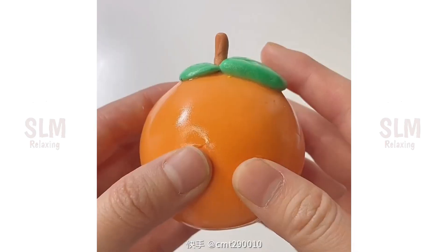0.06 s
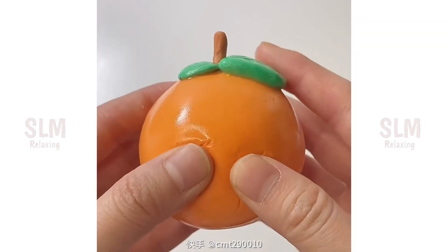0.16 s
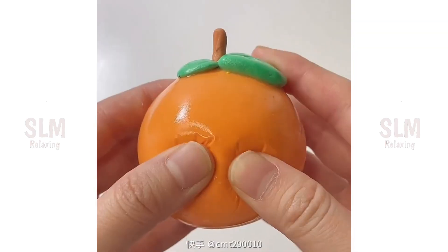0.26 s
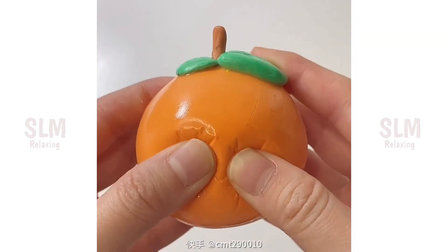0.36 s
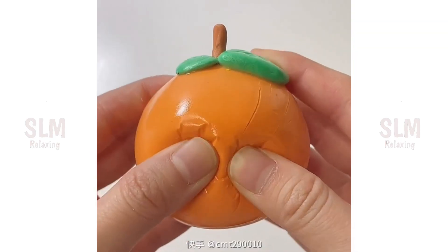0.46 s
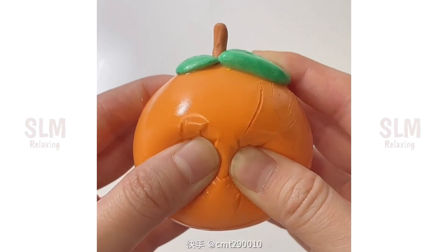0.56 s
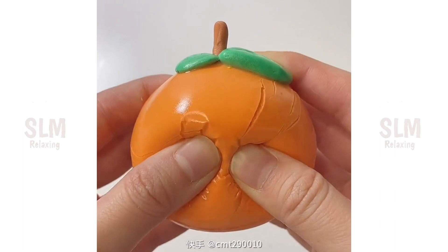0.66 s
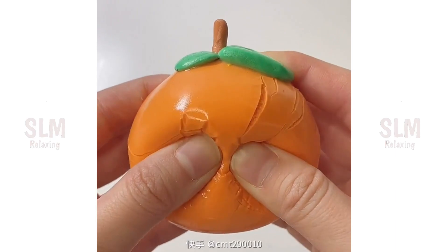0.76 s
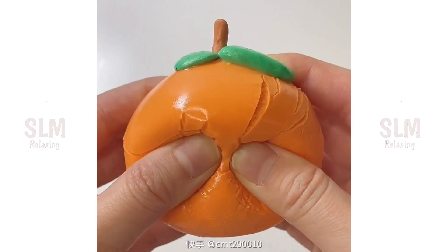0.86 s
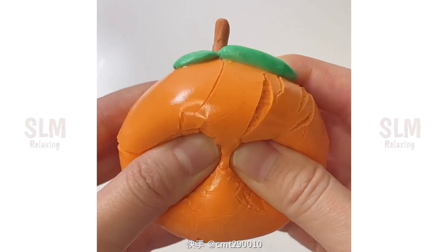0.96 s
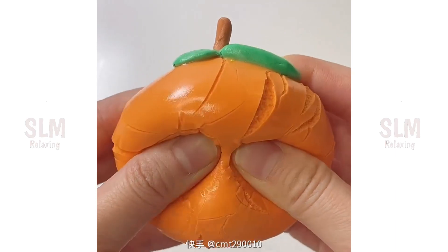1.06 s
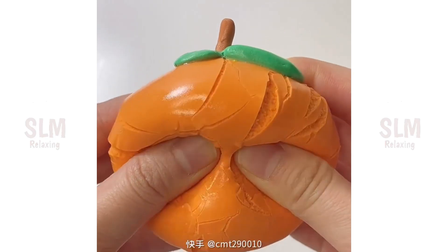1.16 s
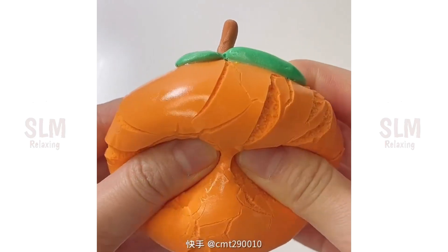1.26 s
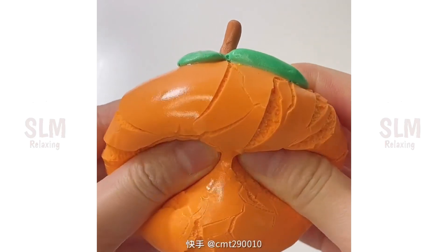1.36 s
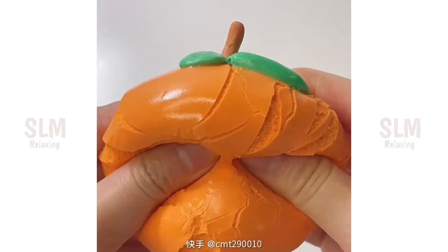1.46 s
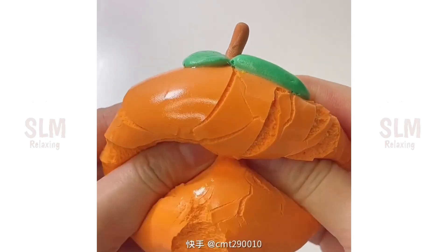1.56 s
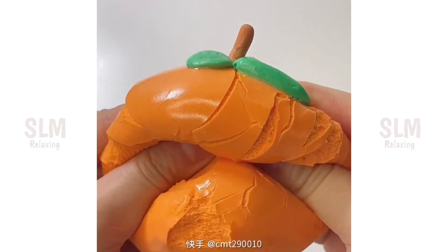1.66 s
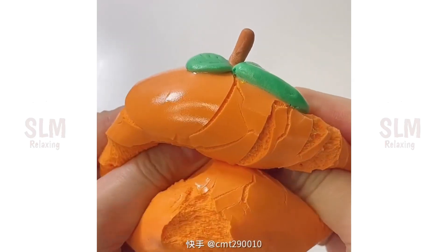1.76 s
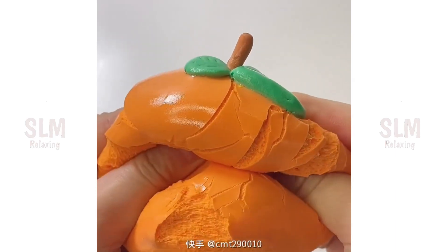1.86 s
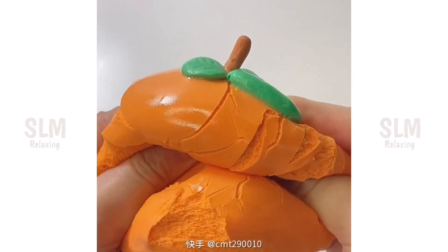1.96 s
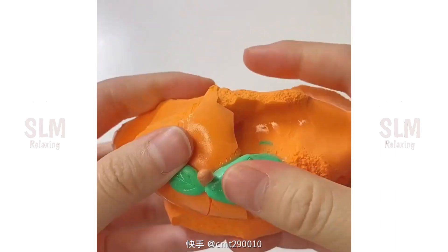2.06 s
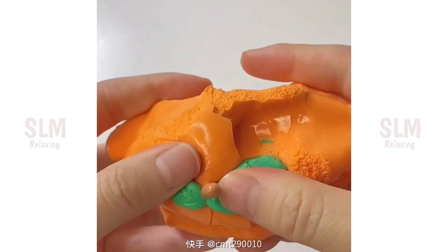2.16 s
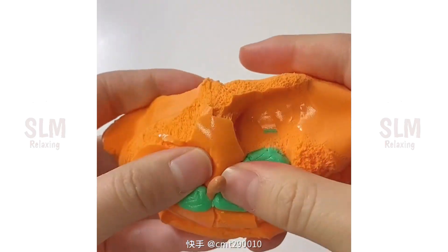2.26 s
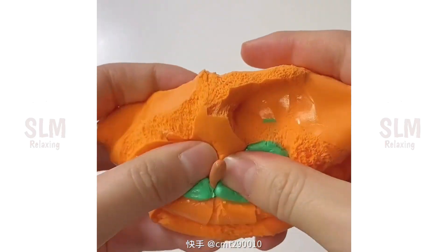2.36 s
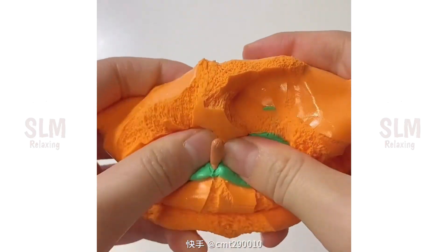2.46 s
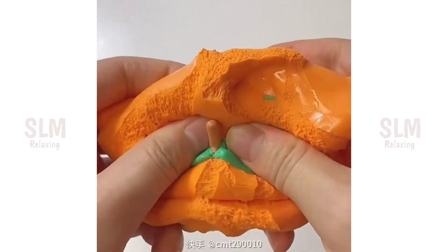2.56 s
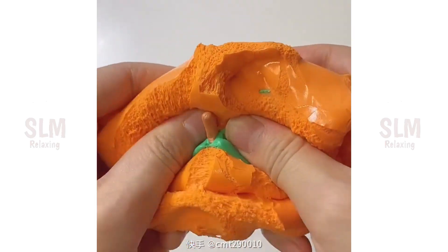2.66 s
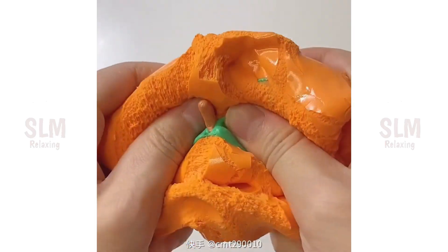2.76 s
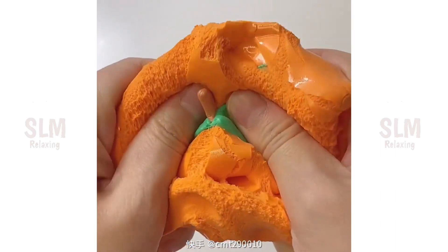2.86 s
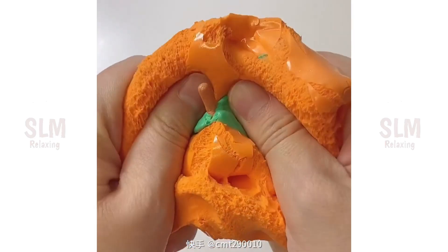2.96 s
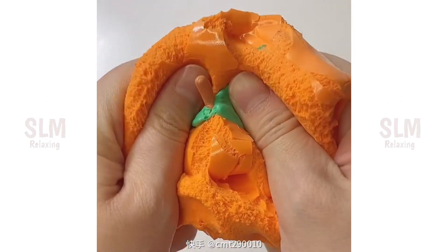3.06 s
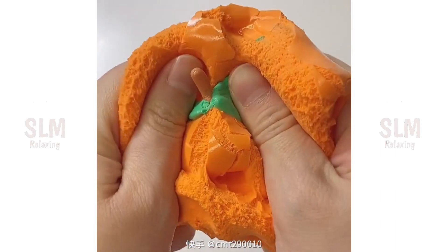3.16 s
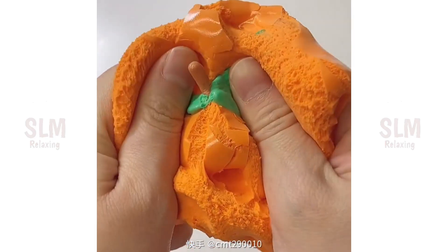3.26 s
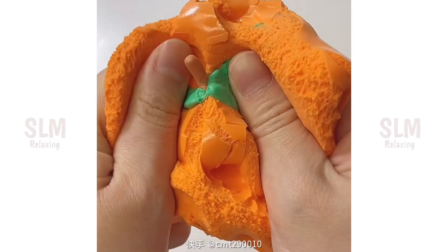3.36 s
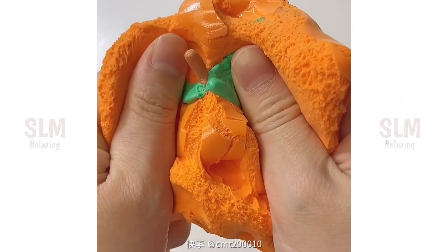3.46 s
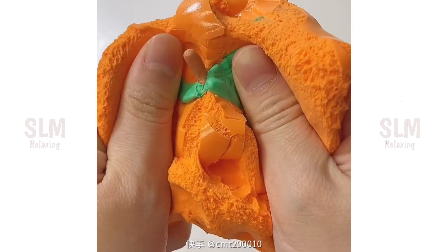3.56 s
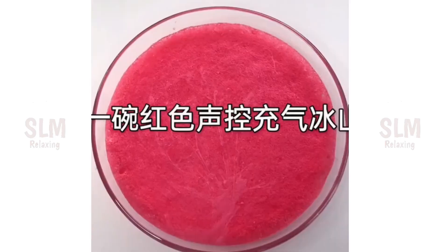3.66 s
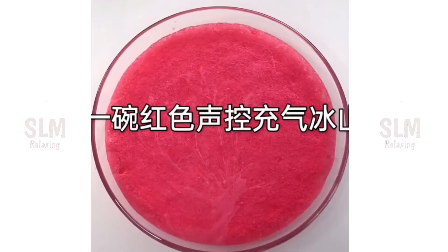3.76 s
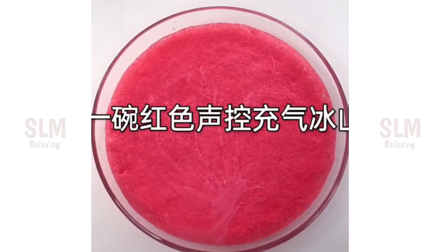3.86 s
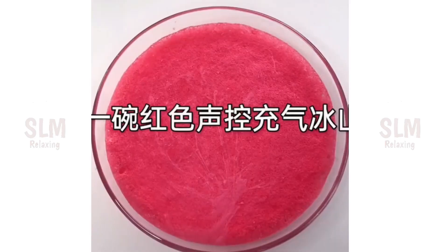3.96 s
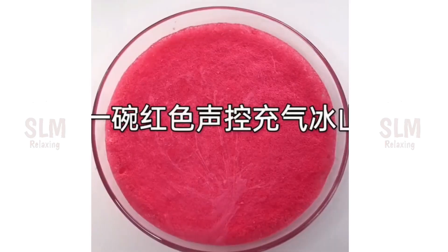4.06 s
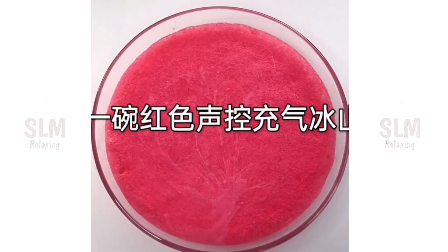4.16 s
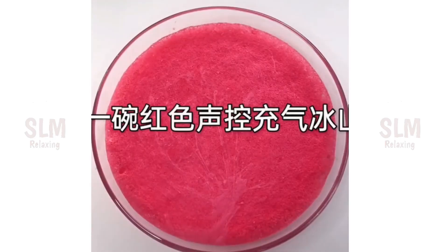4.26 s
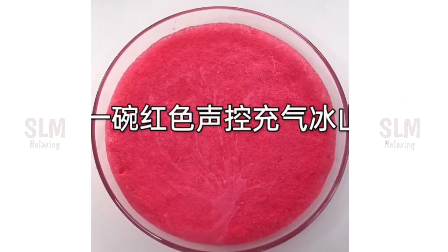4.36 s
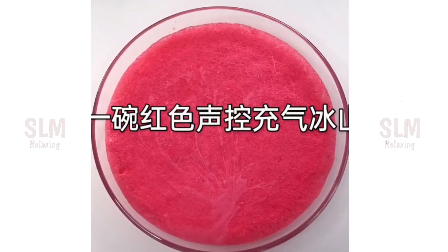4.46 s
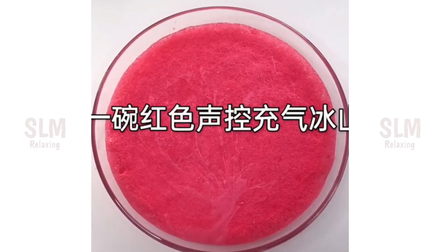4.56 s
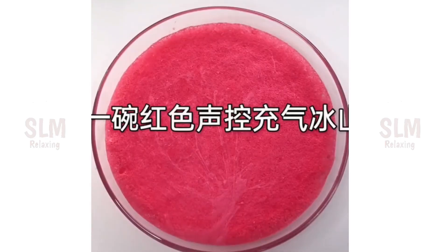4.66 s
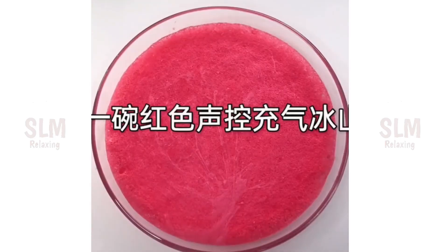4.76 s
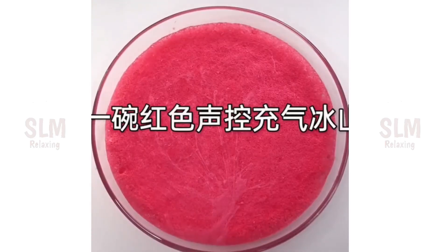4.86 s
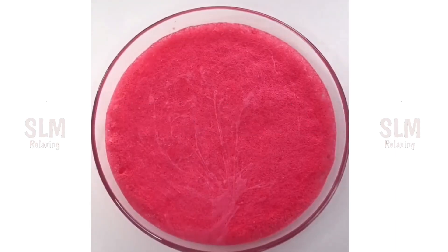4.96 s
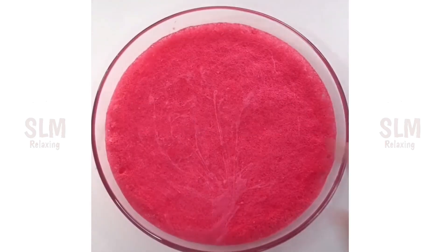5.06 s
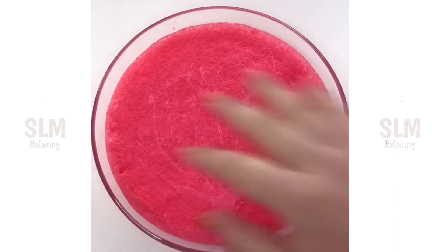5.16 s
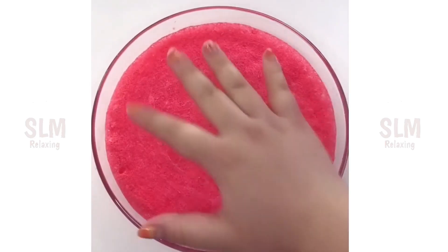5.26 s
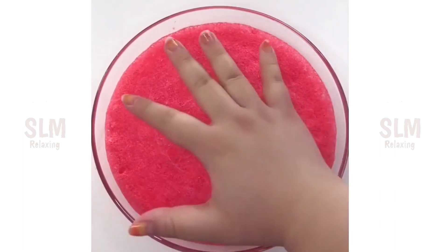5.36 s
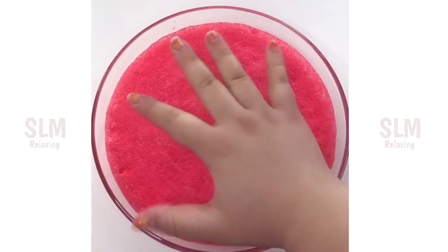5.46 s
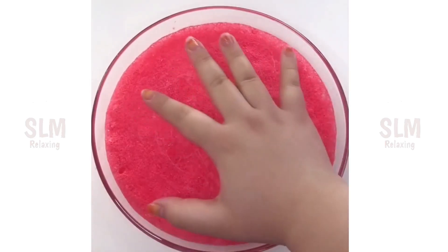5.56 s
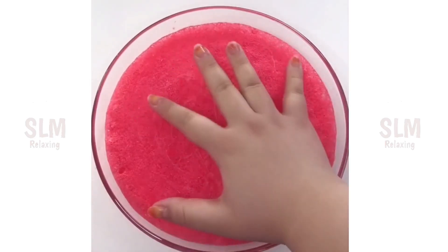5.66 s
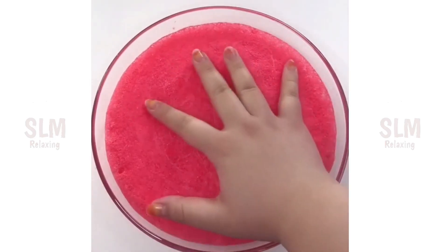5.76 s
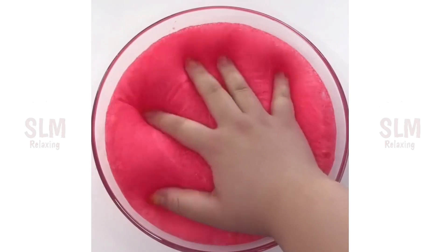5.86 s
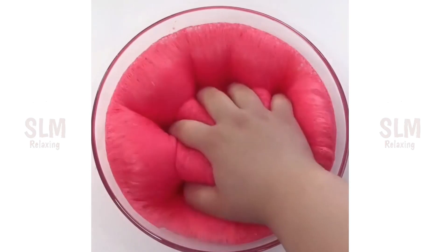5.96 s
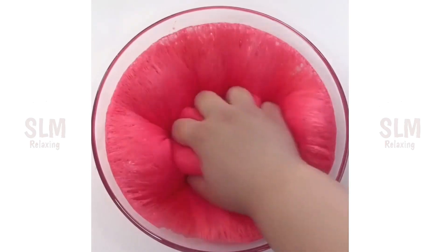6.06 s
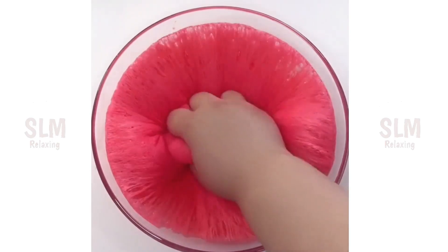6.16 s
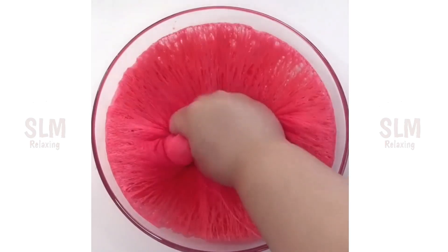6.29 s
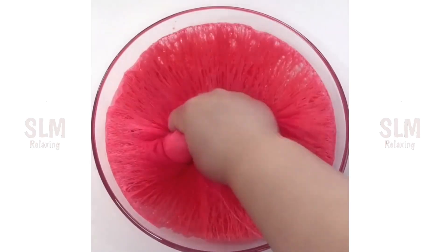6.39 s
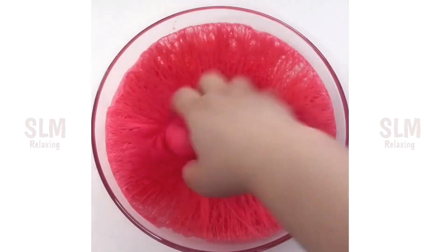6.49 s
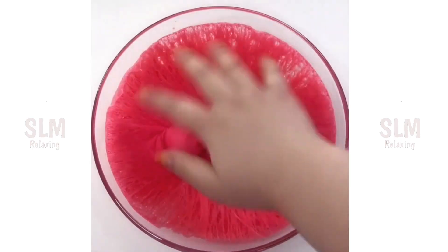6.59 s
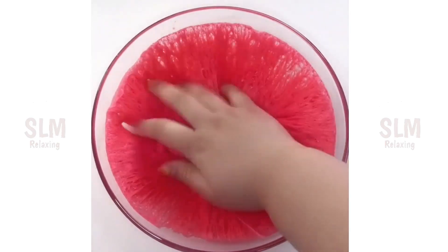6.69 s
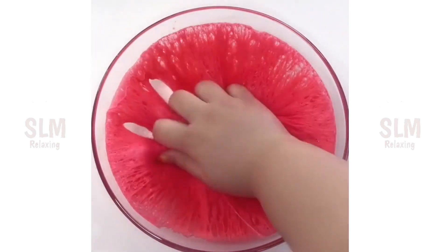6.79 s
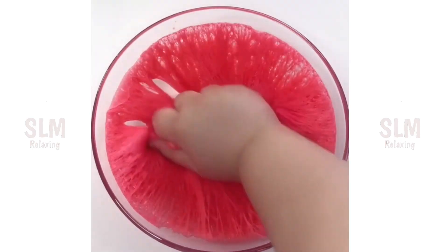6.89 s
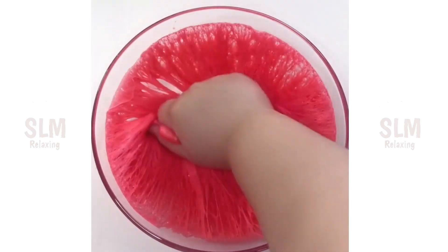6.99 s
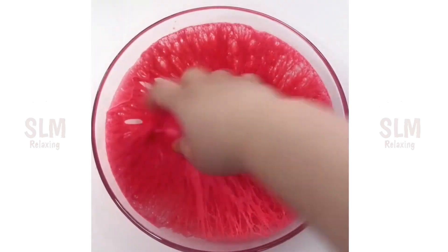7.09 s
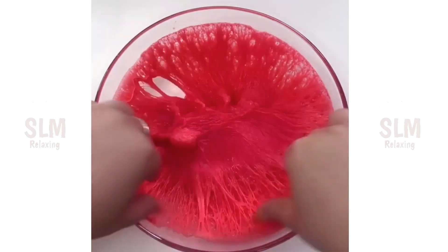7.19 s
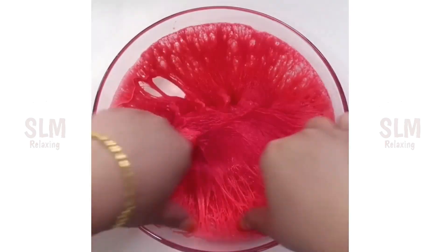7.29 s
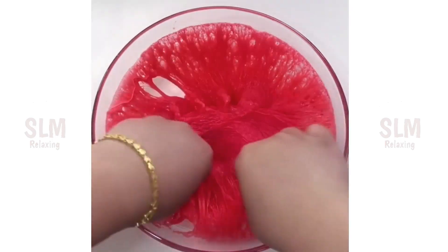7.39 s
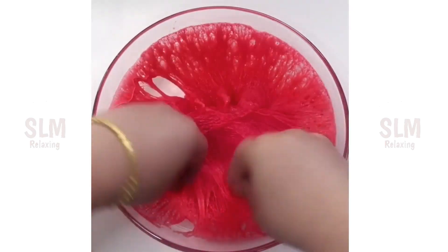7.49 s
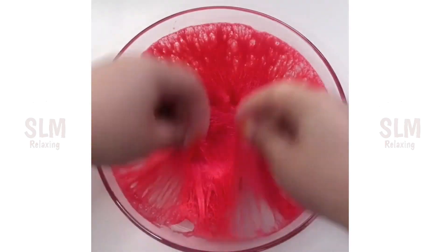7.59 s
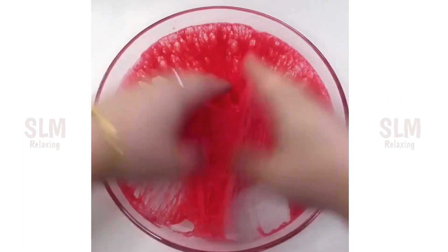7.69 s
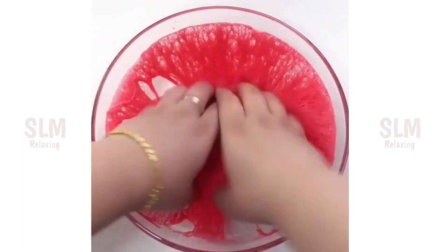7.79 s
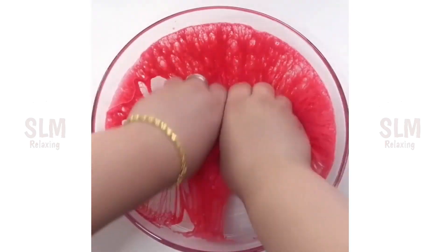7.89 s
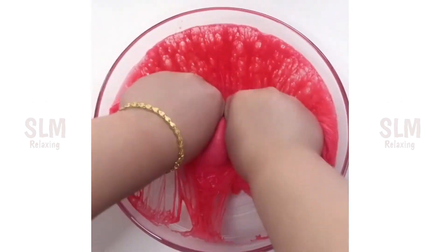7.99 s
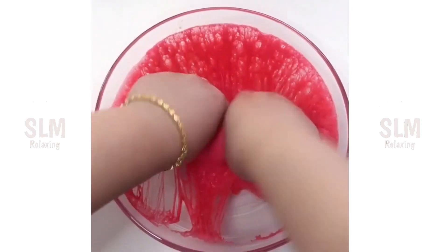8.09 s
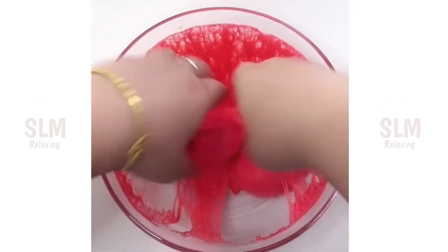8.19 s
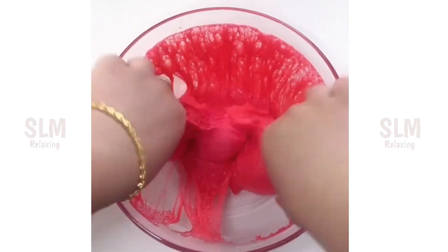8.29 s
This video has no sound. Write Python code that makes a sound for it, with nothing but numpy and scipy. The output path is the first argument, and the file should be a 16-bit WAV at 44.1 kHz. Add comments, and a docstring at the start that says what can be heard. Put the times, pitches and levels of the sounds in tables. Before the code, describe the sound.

Close-up crunchy foam slime crackling and popping under squeezing thumbs, then airy slime in a bowl fizzing, squelching, tearing and snapping over faint room hum.

```python
"""At a table, close to the ear: a dull rustle in a humming room, then two slimes, with brief near-silent gaps.
Thumbs crush a clay-shelled foam slime: noise grains crackle, ripping films ring their cavities, and hands rumble.
Then, in the humming room, a hand kneads aerated slime in a bowl: grains fizz and tear, air bubbles squelch,
pockets snap as short noise bursts, and the knocked bowl rings as a few fading tones."""
import sys
import numpy as np
from scipy import signal
from scipy.fft import rfft, irfft, next_fast_len
from scipy.io import wavfile
from scipy.ndimage import uniform_filter1d

SR = 44100
rng = np.random.default_rng(int(sys.argv[2]) if len(sys.argv) > 2 else 0)


def file_out(sig):
    """Save sig as 16-bit WAV at sys.argv[1]."""
    # one column per channel
    cols = np.atleast_2d(sig).T
    # limit, then scale
    lim = np.clip(cols, -1, 1)
    pcm = np.round(lim * 32767).astype(np.int16)
    wavfile.write(sys.argv[1], SR, pcm)


N = 367353
TIME = np.arange(N) / SR
EDGE_HZ = 15950  # upper edge of the sound

# All colours are relative spectra; source levels are relative too, as trims and shaping follow.

# largest air cells bursting: (time [s], snap level [dB], sizzle level [dB], length [ms], cavity pitch [Hz],
# cavity ring level [dB])
POPS = [(0.188, -46, -60, 3.4, 1415, -47), (0.2166, -46.5, -56.1, 7.8, 1330, -36.5),
        (0.2336, -47.5, -54.1, 10.8, 1330, -38.5), (0.3175, -44, -46, 4.9, 1560, -44),
        (0.3698, -45, -56, 1.8, 1320, -50), (0.3836, -36.5, -41.5, 6.9, 1193, -37),
        (0.4051, -32.5, -40.1, 5.6, 1125, -35), (0.5003, -34, -42, 10.3, 1077, -35.3),
        (0.5199, -33, -41, 3.9, 1195, -31), (0.5861, -33, -33, 5.2, 1250, -27.5),
        (0.6026, -39, -38, 3.2, 2290, -31.6), (0.6326, -46, -41, 3.4, 2153, -23.5),
        (0.6611, -32, -33, 14.3, 1192, -22.5), (0.7013, -31.5, -33.5, 10.5, 1019, -28),
        (0.7416, -34.5, -35, 2.6, 2210, -39), (0.7923, -31, -31.0, 2.6, 2218, -23.5),
        (0.8096, -28.5, -31, 4.2, 2188, -21.5), (0.8556, -30, -29.5, 3.7, 3360, -33),
        (0.8679, -27.5, -32.5, 5.6, 2416, -24), (0.8796, -31.5, -32, 3.1, 1070, -28),
        (0.8975, -37.7, -35, 8.1, 2300, -31), (0.9353, -43, -28, 8.4, 1010, -53),
        (0.9859, -27.5, -34, 11.3, 2166, -21), (1.009, -31, -40, 2.1, 1977, -17),
        (1.0372, -34.5, -33.5, 6.6, 1734, -30), (1.0602, -27.1, -38.5, 18, 2204, -17.5),
        (1.0912, -26.5, -31.5, 4.1, 3340, -42), (1.126, -29.5, -27.5, 8.8, 2410, -36),
        (1.2088, -28.5, -28, 8.5, 900, -47), (1.232, -25, -34.0, 1.8, 2250, -46),
        (1.2685, -29.5, -28, 2.6, 2240, -40), (1.3019, -25, -26.5, 6.9, 2412, -30),
        (1.3175, -26.5, -31.5, 12, 2297, -20), (1.3645, -24.5, -27, 8.7, 1890, -18.5),
        (1.415, -28, -26, 9.4, 1787, -19.5), (1.4495, -28, -25.5, 3.1, 2500, -23),
        (1.4647, -29.5, -30, 3.1, 3208, -38), (1.5095, -28.5, -26.5, 4.2, 2857, -36.5),
        (1.5233, -26.5, -23, 2.9, 3120, -34), (1.5549, -28.5, -27.7, 3.0, 2993, -26.5),
        (1.5689, -27.5, -22.5, 6.4, 3200, -46), (1.6077, -27, -26, 5.9, 2980, -32),
        (1.619, -30, -30, 4.9, 1658.0, -24), (1.6348, -20, -28, 2.4, 2980, -32),
        (1.6498, -25.5, -23.4, 1.2, 1840, -30), (1.6754, -26, -25.3, 5.7, 1567, -17),
        (1.7239, -22, -19.5, 7, 2234, -25), (1.7419, -34.0, -28.5, 3.9, 1277, -24),
        (1.7783, -27.5, -24, 7.1, 2080, -29.5), (1.7868, -32.5, -21, 2.9, 2904, -14.5),
        (1.8081, -24, -21.5, 9.5, 2040, -25.5), (1.8306, -23, -31, 3.6, 2333, -15.5),
        (1.8717, -24.5, -26.5, 3.2, 3040, -26), (1.8989, -43, -28.5, 2.5, 2900, -46),
        (1.914, -28, -18.5, 1.2, 2870, -35), (1.9654, -45, -37, 4.2, 2961, -41),
        (2.0093, -37.2, -32.5, 1.3, 3010, -30), (2.0291, -30.5, -31.5, 5.7, 2963, -21.5),
        (2.0503, -29.5, -30.5, 4.2, 1669, -32.5), (2.1465, -25.5, -27.5, 2.9, 1900, -23.5),
        (2.2038, -59, -42, 1.2, 1860, -38), (2.2173, -33.5, -25.5, 3.9, 1730, -28.5),
        (2.2256, -25.5, -25.5, 3.1, 1686, -30.5), (2.2375, -25.0, -23, 3.4, 1813, -19.5),
        (2.2997, -23.5, -26, 9.8, 1810, -37.5), (2.3266, -23.5, -23, 5.8, 1758, -21.5),
        (2.344, -26.5, -23.4, 1.6, 2800, -43.9), (2.3632, -28, -24, 5.4, 3130, -39),
        (2.3784, -20.7, -23.5, 2.7, 1840, -18), (2.389, -20.5, -21.5, 6.5, 1826, -14.5),
        (2.4119, -20.5, -26, 2.8, 2030, -22.5), (2.4355, -15, -29, 4.6, 2210, -18),
        (2.4667, -15.5, -22.5, 1.9, 2167, -8), (2.4949, -19, -25, 3.7, 1981, -19.4),
        (2.5322, -16, -24.5, 8.4, 2080, -15), (2.5575, -18.5, -29, 4, 2630, -30.5),
        (2.6374, -20.5, -19.5, 7.2, 2087, -13), (2.6705, -21, -27.5, 4.3, 2379, -14),
        (2.687, -26, -15.5, 1.9, 2840, -26.5), (2.7017, -27.5, -30, 2.3, 1900, -25.5),
        (2.7484, -31.5, -26.5, 5.7, 2300, -30), (2.7651, -31.5, -36.5, 4.3, 2350, -31),
        (2.7841, -29.5, -19, 2.9, 2470, -15), (2.8035, -18.5, -23, 4.7, 2040, -19),
        (2.839, -18, -22.0, 10.6, 2217, -17), (2.8603, -15, -18.5, 6.3, 2130, -21),
        (2.9177, -21.5, -25, 1, 2330, -37), (2.9621, -20.5, -24, 4, 2196, -21.5),
        (3.0029, -15.5, -24, 7.6, 3210, -31), (3.0244, -12.5, -30, 1.8, 2063, -15),
        (3.0534, -21, -32, 3.2, 1980, -39), (3.0885, -28, -23, 1.6, 2770, -46),
        (3.1575, -22.5, -33, 2.3, 1880, -26), (3.17, -14.5, -15.5, 3.6, 1790, -22),
        (3.1911, -24.5, -30, 8.1, 3185, -16), (3.2271, -14.5, -18, 0.88, 3090, -38),
        (3.2665, -33, -37.5, 2.1, 1626, -38), (3.2912, -23, -39, 3.5, 2080, -28),
        (3.3411, -23.5, -18.5, 6.8, 3030, -30), (3.4079, -26.5, -29, 1.7, 2040, -42.8),
        (3.4405, -24.5, -20, 1.2, 3100, -52), (3.4692, -35, -43, 1.7, 3180, -55.3)]
# how hard the thumbs press, one curve a squeeze: (time [s], effort level [dB])
SQUEEZES = [
    [(0.13, -67.5), (0.23, -63.5), (0.39, -47), (0.9, -49), (1.03, -33), (1.22, -42.5), (1.35, -39),
     (1.45, -43.5), (1.68, -45.5), (1.8, -34.5), (1.95, -58), (2.07, -46.5)],
    [(2.11, -60.5), (2.22, -46.5), (2.38, -36), (2.52, -28), (2.72, -39), (2.85, -33), (2.99, -29),
     (3.08, -40), (3.42, -53.5), (3.6, -69), (3.73, -64)],
]
# air sighs out as the thumbs ease off: (start time [s], length [s], peak at share of length [0-1], level [dB])
SIGHS = [(3.44, 0.078, .5, -52), (3.515, 0.025, .3, -40.5), (3.62, 0.14, 0.73, -61)]
# colour of the small cells' crackle: (frequency [Hz], level [dB per Hz])
CRACKLE_COLOUR = [(1500, -50), (3000, -2.5), (4500, 2), (7000, 1.5), (10000, 0.5), (13000, 4),
                  (16000, -3.5)]
# colour of the small cells' squish: (frequency [Hz], level [dB per Hz])
SQUISH_COLOUR = [(100, -15), (300, -9.5), (550, -16), (900, -5), (1400, -6.5), (2000, 1), (3000, -7),
                 (4500, -28), (9000, -20)]
# high sizzle of a burst or a sigh: (frequency [Hz], level [dB per Hz])
SIZZLE_COLOUR = [(6000, -57.5), (8500, 3), (10000, 8.5), (12500, 10), (16000, 7)]
# drier, fuller crack of a burst until the clay shell has given way: (frequency [Hz], level [dB per Hz])
SHELL_COLOUR = [(100, -19), (300, -12.5), (600, -5), (950, -1), (2500, -0.5), (4500, 3.5), (7500, 2.5),
                (9500, -13), (12000, -21.5)]
# snap of a burst after that: (frequency [Hz], level [dB per Hz])
POP_COLOUR = [(100, -17), (300, -16), (600, -8), (1200, -9.5), (2500, -1), (4500, 2), (7500, 3.5),
              (9500, -7), (12000, -13.5)]
SHELL_GONE_S = 2.0


def foam_slime():
    """Large cells pop over a bed of small ones that crackle and squish with the effort of the thumbs."""
    effort = sum(levels(rows)[0] for rows in SQUEEZES)
    small = grains(per_s=14000, spread_db=2.6, clump_db=2.8, clump_per_s=380, channels=2)
    crackle = amp(1) * colour(small, CRACKLE_COLOUR)
    squish = amp(-5.5) * colour(small, SQUISH_COLOUR)
    sighs = strokes(SIGHS)[0] * colour(small, SIZZLE_COLOUR)
    bed = effort * (crackle + squish) + sighs

    rows = list(POPS) + cells()
    shelled = [row for row in rows if row[0] < SHELL_GONE_S]
    bare = [row for row in rows if row[0] >= SHELL_GONE_S]
    cracks = bursts(shelled, SHELL_COLOUR, SIZZLE_COLOUR,
                    glide=0.099, ragged=0.207, taut_hz=2390, snap_db=2.5, sizzle_db=0, ring_db=-1)
    pops = bursts(bare, POP_COLOUR, SIZZLE_COLOUR,
                  glide=0.1004, ragged=0.1, taut_hz=1850, snap_db=-0.5, sizzle_db=0.5, ring_db=.5)
    crunch = mottle(bed + cracks + pops, depth_db=2.3, pitch_bins=4, time_frames=14)
    return reflect(ports(crunch))


# one middling cell bursts at a random moment in each slot; level and ring follow the effort
CELLS_PER_S, CELL_MS = 40, 4.9
CELL_DB, CELL_SPREAD_DB, CELL_RING_DB = 5.5, 3, 1
CELL_SPREAD_OCT = .4
# cavities shrink during each squeeze, one row a squeeze: (pitch at its start [Hz], pitch at its end [Hz])
CELL_PITCH = [(1150, 2700), (1650, 3100)]


def cells():
    """Middling cells give way at random, louder under more effort: rows like those of POPS."""
    rows = []
    for squeeze, pitch_hz in zip(SQUEEZES, CELL_PITCH):
        s, effort_db = np.transpose(squeeze)
        slots = np.arange(s[0], s[-1] - 1 / CELLS_PER_S, 1 / CELLS_PER_S)
        chances = rng.uniform(-1, 1, size=(200, 4))
        for slot, (late, size, ring, pitch) in zip(slots, chances):
            at = slot + (1 + late) / 2 / CELLS_PER_S
            db = np.interp(at, s, effort_db) + CELL_DB + CELL_SPREAD_DB * size
            hz = np.interp(at, s[[0, -1]], pitch_hz) * 2 ** (CELL_SPREAD_OCT * pitch)
            ring_db = db + CELL_RING_DB + CELL_SPREAD_DB * ring
            rows.append((at, db, db, CELL_MS, hz, ring_db))
    return rows


# modes of an opened cavity, its air and its soft wall: (pitch ratio [-], level [dB], fade when taut [cycles])
CAVITY = [(1, 1.5, 2.0), (.56, -11, .6)]


def bursts(rows, snap_colour, sizzle_colour, glide, ragged, taut_hz, snap_db, sizzle_db, ring_db):
    """A film rips for a few milliseconds; the opened cavity rings briefly, rising in pitch."""
    lead = .008  # seconds kept before each burst's time, for its onset
    t = np.arange(2048) / SR - lead
    snaps, sizzles, rings = np.zeros((3, 2, N))
    scatter = .16 * (t > 0) * np.exp(-abs(t) / .005)  # a weak noise tail
    for s, snap, sizzle, ms, hz, cavity in rows:
        length = max(ms, 1) / 1000
        u = np.maximum(t / (.5 * length) + 1.25, 0)
        envelope = np.hypot((u * np.exp(1 - u)) ** 2, scatter)
        rip = envelope * rng.standard_normal((2, len(t)))
        add(snaps, s - lead, amp(snap + snap_db) * rip)
        add(sizzles, s - lead, amp(sizzle + sizzle_db) * rip)

        age = np.maximum(t + 0.31 * length, 0)
        # random jitter of the pitch makes each ring rough and less pure
        jitter = ragged * np.sqrt(SR / hz) * rng.standard_normal((2, len(t)))
        bend = 1 + glide * np.tanh(t * hz / 4) + jitter
        turns = np.cumsum(hz * bend, axis=1) / SR + rng.random((2, 1))
        for ratio, db, cycles in CAVITY:
            fade = cycles * min(hz / taut_hz, 1)  # large, slack cavities die sooner
            onset = (1 - np.exp(-age / (0.46 * length))) ** 2
            swell = onset * np.exp(-age * hz * ratio / fade)
            tone = np.sin(2 * np.pi * ratio * turns)
            add(rings, s - lead, amp(cavity + ring_db + db) * swell / swell.max() * tone)
    return colour(snaps, snap_colour) + colour(sizzles, sizzle_colour) + rings


# reflections off the hands and the table: (delay time [ms], gain [-])
ECHOES = [(.7, -0.019), (1.9, -0.11), (4.3, 0.15), (9.2, 0.16)]


def reflect(pair):
    """Hands and table send back close echoes, as delayed copies."""
    out = pair.copy()
    for ms, gain in ECHOES:
        add(out, ms / 1000, gain * pair)
    return out


# likeness of the sound at the two microphone ports: (frequency [Hz], likeness [0-1])
LIKENESS = [(100, 0.99), (350, 0.48), (700, 0.58), (1100, 0.92), (1700, 0.98), (2300, 0.86), (3200, 0.37),
            (5000, 0.15), (6500, 0.5), (11000, 0.05), (15000, 0.8)]
PORT_LAG_S = 1.7e-5


def ports(pair):
    """Two close ports hear partly the same sound, which reaches the right one a moment later."""
    size = next_fast_len(N + 4096)
    hz = np.fft.rfftfreq(size, 1 / SR)
    left, other = rfft(pair, size)
    same = np.clip(read(LIKENESS, hz), 0, 1)
    mixed = same * left + np.sqrt(1 - same ** 2) * other
    right = mixed * np.exp(-2j * np.pi * hz * PORT_LAG_S)
    return irfft([left, right], size)[:, :N]


# kneading strokes: (start time [s], length [s], peak at share of length [0-1], fizz level [dB],
# wet tearing level [dB], squelch level [dB])
STROKES = [(5.69, 0.21, 0.65, -38, -55, -71), (5.86, 0.22, 0.27, -55, -47, -50.5),
           (6.08, 0.23, 0.68, -47, -52, -48), (6.368, 0.12, 0.25, -48, -47, -44.5),
           (6.635, 0.038, 0.35, -42, -49.5, -40), (6.7, 0.26, 0.68, -48.5, -48, -50),
           (6.82, 0.086, 0.39, -41, -54, -40), (6.985, 0.097, 0.88, -52, -44.5, -40),
           (7.235, 0.18, 0.97, -48, -57.5, -56), (7.43, 0.12, 0.47, -61, -53.5, -56),
           (7.57, 0.2, 0.95, -66, -57, -50), (7.752, 0.27, 0.067, -41, -50, -41),
           (7.91, .11, 0.28, -52, -37.5, -34.5), (8.055, 0.091, 0.55, -48, -41.5, -33),
           (8.275, .055, 0.31, -45, -58, -40)]
# air pockets bursting: (time [s], snap level [dB], sizzle level [dB], length [ms], cavity pitch [Hz],
# cavity ring level [dB])
SNAPS = [(6.1973, -41, -35.5, 2.1, 760, -57), (6.253, -27.5, -30.5, 2, 1270, -34),
         (6.6698, -35, -24, 0.91, 820, -59), (6.8248, -31, -33.5, 1.4, 1410, -43),
         (6.8405, -51, -42, 3.6, 456, -28), (6.8495, -36, -26, 2.5, 1884, -26),
         (6.864, -38, -35.5, 5.6, 1410, -28.5), (7.17, -23.5, -31, 1.5, 1977, -24.5),
         (7.173, -35, -48, 3.1, 352, -32.5), (7.3623, -43, -31.5, 1.6, 1160, -52),
         (7.5086, -66, -37.5, 2.5, 1140, -50), (7.7783, -32.5, -27.5, 0.79, 1390, -59),
         (7.8719, -27.5, -35, 1.6, 2395, -31), (7.9336, -47, -30, 2.5, 1057, -29.5),
         (7.9588, -36, -29.5, 2.6, 1210, -24), (7.9836, -35.5, -28.5, 3, 1290, -40)]
# resting foam whispers: (start time [s], length [s], peak at share of length [0-1], level [dB])
WHISPERS = [(4.08, .2, .65, -59.5), (4.32, 0.073, .7, -58), (4.935, 0.057, 0.17, -58),
            (5.0, 0.45, .15, -71.5)]
# fine foam under the palm: (frequency [Hz], level [dB per Hz])
FIZZ_COLOUR = [(4000, -9), (8000, -4.5), (11000, -4.5), (13500, -4), (14800, 2.5), (15700, 0.5),
               (16400, -9)]
# tearing strands: (frequency [Hz], level [dB per Hz])
TEAR_COLOUR = [(900, -9.5), (2000, 1), (2800, -4), (4000, 0), (5500, -4.5), (7500, -5), (11000, -8.5)]
# grains in the squelch: (frequency [Hz], level [dB per Hz])
SQUELCH_COLOUR = [(120, -51), (280, -5), (430, -4), (750, 3.5), (1200, 1.5), (1700, -11), (3000, -42)]
# body of a snap: (frequency [Hz], level [dB per Hz])
SNAP_COLOUR = [(150, -31), (400, 2.5), (1500, -10), (2800, -7), (4200, -3.5), (6500, 4), (9000, -0.5),
               (12000, -23)]
# high sizzle of a snap: (frequency [Hz], level [dB per Hz])
SPIT_COLOUR = [(6000, -53), (9000, -20), (11000, 10), (13000, 10.5), (15500, 13.5)]


def bowl_slime():
    """Fine foam fizzes under the palm, strands tear, trapped air squelches and snaps."""
    fizz_gain, tear_gain, squelch_gain = strokes(STROKES)
    foam = grains(per_s=9000, spread_db=3.2, clump_db=1.8, clump_per_s=250)
    fizz = amp(-2.0) * fizz_gain * colour(foam, FIZZ_COLOUR)
    strands = grains(per_s=5000, spread_db=3.2, clump_db=1.8, clump_per_s=250)
    tear = amp(1.0) * tear_gain * colour(strands, TEAR_COLOUR)
    blobs = grains(per_s=1200, spread_db=3.5, clump_db=5, clump_per_s=160)
    squelch = amp(-6.0) * colour(blobs, SQUELCH_COLOUR)
    squelch += amp(-5.5) * bubbles(per_s=300, low_hz=323.5, high_hz=1507, cycles=1.2, glide=0.17)
    kneading = fizz + tear + amp(-1.5) * squelch_gain * squelch
    wet = mottle(kneading, depth_db=2.4, pitch_bins=4, time_frames=28)

    snaps = bursts(SNAPS, SNAP_COLOUR, SPIT_COLOUR,
                   glide=0.04, ragged=0.19, taut_hz=394, snap_db=1.5, sizzle_db=3.0, ring_db=-0.5)[0]
    still_foam = grains(per_s=3600, spread_db=0.5, clump_db=2.0, clump_per_s=42)
    resting = amp(-1) * strokes(WHISPERS)[0] * colour(still_foam, CRACKLE_COLOUR)
    return wet + snaps + resting


def bubbles(per_s, low_hz, high_hz, cycles, glide, count=24):
    """Small air bubbles of many sizes, each a short ring that rises in pitch."""
    t, out = np.arange(2048) / SR, np.zeros(N)
    for hz in np.geomspace(low_hz, high_hz, count):
        age = t * hz / cycles
        rising_hz = hz * (1 + glide * np.tanh(age / 3))
        ring = age * np.exp(-age) * np.sin(2 * np.pi * np.cumsum(rising_hz) / SR)
        births = (rng.random(N) < per_s / count / SR) * rng.uniform(0.33, 1, N)
        out += signal.oaconvolve(births, ring)[:N]
    return unit(out)


# the hands shift their grip: (start time [s], length [s], peak at share of length [0-1],
# deep thrum level [dB], rubbing level [dB])
GRIPS = [(.25, 0.62, 0.51, -76, -55), (.66, 0.48, 0.88, -75, -40), (1.2, 0.23, 0.36, -53.5, -50.5),
         (1.56, 0.42, 0.8, -55, -60), (2.2, 0.55, 0.63, -55.5, -52), (2.66, .48, .6, -59, -43.5),
         (3.16, 0.22, 0.76, -45, -46), (3.36, 0.42, 0.32, -35, -44.5)]
# a thumb judders over the slime: (start time [s], length [s], peak at share of length [0-1], level [dB],
# pitch [Hz])
JUDDERS = [(2.718, 0.1, 0.48, -28.5, 133.3), (3.48, 0.078, 0.48, -36.5, 146.2)]
# deep thrum of the grip: (frequency [Hz], level [dB per Hz])
THRUM_COLOUR = [(20, -14.5), (32, -20), (45, 11), (70, 4.5), (100, -3), (160, -14), (400, -43.5)]
# rubbing hands: (frequency [Hz], level [dB per Hz])
HAND_COLOUR = [(50, -12), (95, -6.5), (135, 0.5), (200, -8.5), (320, -16.5), (700, -32), (2000, -70.5)]


def hands():
    """The grip rumbles as dull noise; a thumb that sticks and slips hums as a short steady tone."""
    thrum_gain, rub_gain = strokes(GRIPS)
    thrum = amp(-3) * thrum_gain * colour(rng.standard_normal(N), THRUM_COLOUR)
    rub = amp(-3.0) * rub_gain * colour(rng.standard_normal((2, N)), HAND_COLOUR)
    judder = sum(strokes([stroke])[0] * np.sin(2 * np.pi * hz * TIME) for *stroke, hz in JUDDERS)
    return thrum + ports(rub) + judder


# bumps against the bowl: (time [s], level [dB])
KNOCKS = [(4.218, -49), (7.7286, -21)]
# tones of the knocked bowl: (pitch [Hz], level [dB], time to fade by 60 dB [s])
BOWL = [(189, -13.5, 0.34), (236, -12, 0.23), (386, -8.5, 0.11), (454, 4.5, 0.033), (650, -3, 0.1),
        (915, 11, 0.013), (1210, -10, 0.036), (1900, -14, .014), (2800, -15, .012)]


def knock():
    """The hands bump the bowl; the slime damps its modes quickly."""
    t, out = np.arange(SR // 4) / SR, np.zeros(N)
    ring = sum(amp(db - 60 * t / t60) * np.sin(2 * np.pi * hz * t) for hz, db, t60 in BOWL)
    soft_onset = 1 - np.exp(-t / 0.0016)
    for s, db in KNOCKS:
        add(out, s, amp(db) * ring * soft_onset)
    return out


# dull rustle: (frequency [Hz], level [dB per Hz])
RUSTLE_COLOUR = [(90, 3.5), (180, 4), (400, -10), (1000, -8.5), (1600, -16), (4000, -61)]
RUSTLE_DB = -48.5


def rustle():
    """A brief dull rustle of filtered noise that ends at the first gap."""
    before = TIME < GAPS[0][0]
    return amp(RUSTLE_DB) * before * colour(rng.standard_normal(N), RUSTLE_COLOUR)


# low room hum: (frequency [Hz], level [dB per Hz])
HUM_COLOUR = [(20, -16), (45, -21), (64, -8.5), (76, 7), (92, -8.5), (120, -12.5), (155, -4), (200, -14),
              (330, -20), (900, -100)]
# faint room air: (frequency [Hz], level [dB per Hz])
AIR_COLOUR = [(150, -38), (250, -7), (378, -2.5), (458, -7), (516, -8), (852, -10), (1360, -12.5),
              (15500, -31)]
AIR_DB, HUM_DB = -60.5, -53
HUM_WAVER_DB, HUM_WAVERS_PER_S = -1.5, 2.8


def room():
    """Low noise with a wavering level hums under faint air, absent while the foam slime is crushed."""
    waver_db = HUM_WAVER_DB * wander(HUM_WAVERS_PER_S)
    hum = amp(HUM_DB + waver_db) * colour(rng.standard_normal(N), HUM_COLOUR)
    air = amp(AIR_DB) * colour(rng.standard_normal(N), AIR_COLOUR)
    present = (TIME < GAPS[0][0]) | (TIME > GAPS[1][0])
    return present * (hum + air)


def grains(per_s, spread_db, clump_db, clump_per_s, channels=1):
    """Tiny ruptures at random moments, of uneven size, that swell and thin in clumps."""
    shape = (channels, N)
    size = amp(spread_db * np.minimum(rng.exponential(1, shape), 4))
    happens = rng.random(shape) < per_s / SR
    clicks = size * rng.choice([-1., 1.], shape) * happens
    return unit(clicks * amp(clump_db * np.clip(wander(clump_per_s), -2, 2)))


def mottle(x, depth_db, pitch_bins, time_frames):
    """Random smooth gains over pitch and time mottle the sound, so its colour varies from moment to moment."""
    z = signal.stft(x, nperseg=256, noverlap=192)[2]
    patches = rng.standard_normal(z.shape[-2:])
    patches = uniform_filter1d(patches, size=pitch_bins, axis=0)
    patches = uniform_filter1d(patches, size=time_frames, axis=1)
    gains = unit(amp(depth_db * unit(patches)))
    return signal.istft(z * gains, nperseg=256, noverlap=192)[1][..., :N]


ATTACK_S, SWELL_DB, RELEASE_S = 0.012, 7.5, 0.021


def strokes(rows):
    """One gain curve for each dB column: every stroke sets in, swells to its peak, eases and lets go."""
    gains = 0
    for start, length, peak, *db in rows:
        age = TIME - start
        shares = [0, np.clip(peak, .01, .99), 1]
        swell = amp(np.interp(age / length, shares, [-SWELL_DB, 0, -SWELL_DB]))
        attack = np.clip(age / ATTACK_S, 0, 1)
        release = np.exp(-np.clip((age - length) / RELEASE_S, 0, 20))
        gains = gains + np.outer(amp(db), swell * attack * release)
    return gains


def levels(rows):
    """One gain curve for each dB column, practically silent outside the rows."""
    s, *columns = np.transpose(rows)
    return [amp(np.interp(TIME, s, c, left=-140, right=-140)) for c in columns]


def colour(x, spectrum):
    """Filters by a spectrum, keeping the power of white noise."""
    size = next_fast_len(N + 4096)
    hz = np.fft.rfftfreq(size, 1 / SR)
    gain = unit(amp(read(spectrum, hz)) * (hz < EDGE_HZ + 500))
    return irfft(rfft(x, size) * gain, size)[..., :N]


def read(points, hz):
    """Reads a table of (Hz, value) on a log-frequency axis."""
    f, value = np.transpose(points)
    return np.interp(np.log(hz + 1), np.log(f + 1), value)


def wander(per_s):
    """A random curve of rms 1: straight lines between per_s random points a second."""
    return unit(np.interp(TIME * per_s, np.arange(N), rng.standard_normal(N)))


def add(mix, s, sound):
    """Mixes a sound in at time s."""
    part = mix[..., max(round(s * SR), 0):][..., :sound.shape[-1]]
    part += sound[..., :part.shape[-1]]


def amp(db):
    """Turns decibels into a gain."""
    return 10 ** (np.asarray(db) / 20)


def unit(x):
    """Scales to rms 1."""
    return x / np.sqrt(np.mean(x ** 2) + 1e-20)


def scene():
    """All sources together, from the slimes to the room."""
    return foam_slime() + bowl_slime() + hands() + knock() + rustle() + room()


# near-silent gaps: (start time [s], end time [s])
GAPS = [(.087, .138), (3.718, 3.786), (4.868, 4.905), (7.195, 7.226)]
CEILING = .45  # the level that rounded peaks approach


def record(dry):
    """The tallest peaks are rounded off and the sound drops out at each gap; then the band limit."""
    limited = dry / (1 + (dry / CEILING) ** 4) ** .25
    live = np.ones(N)
    for start, end in GAPS:
        live[(TIME > start) & (TIME < end)] = amp(-34)
    faded = limited * uniform_filter1d(live, size=300)  # short fades at the edges
    low_pass = signal.firwin(401, EDGE_HZ, window=("kaiser", 8), fs=SR)
    return signal.oaconvolve(faded, low_pass[None], "same")


dry = scene()
out = record(dry)
file_out(out)
```